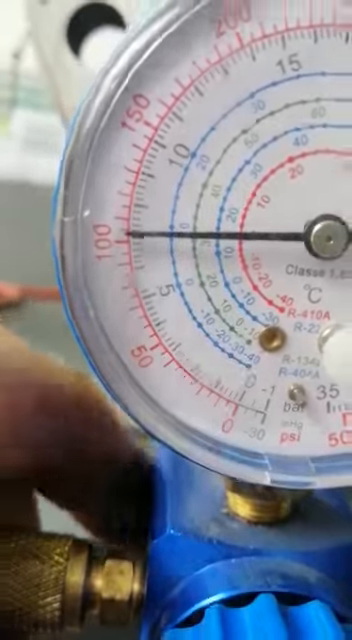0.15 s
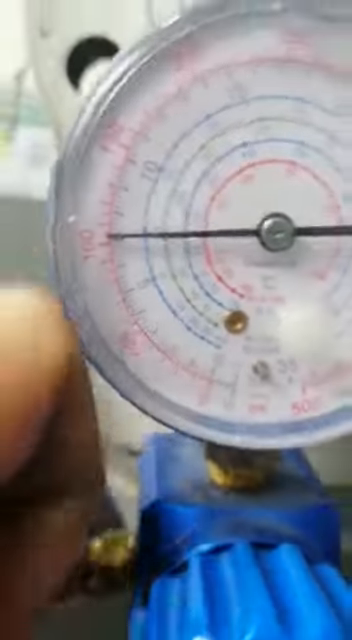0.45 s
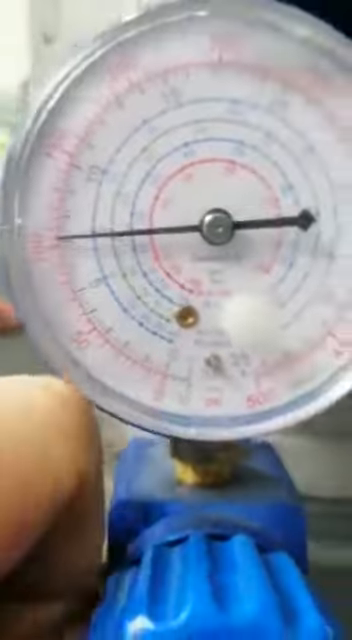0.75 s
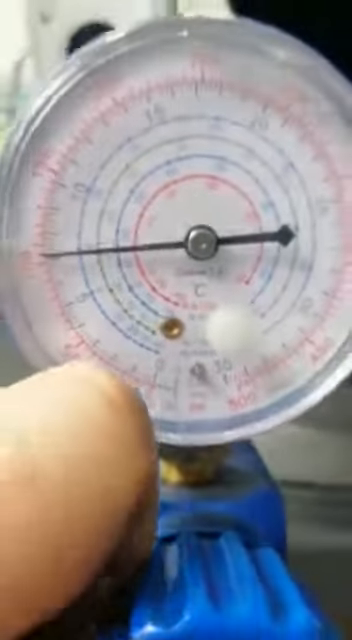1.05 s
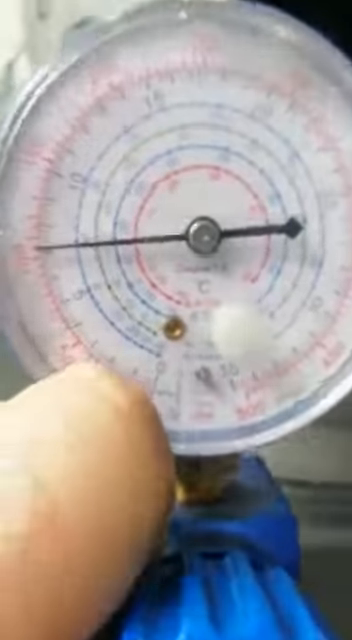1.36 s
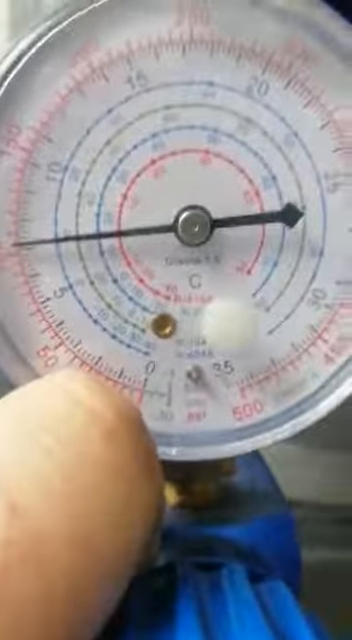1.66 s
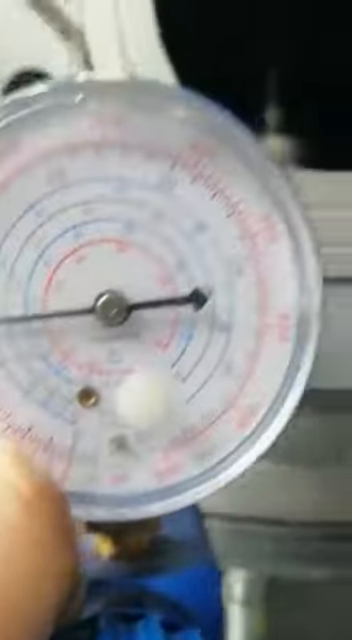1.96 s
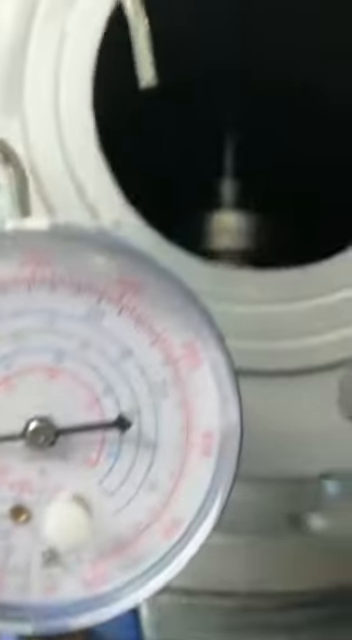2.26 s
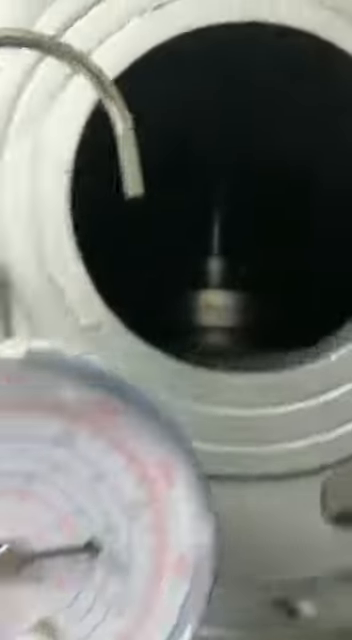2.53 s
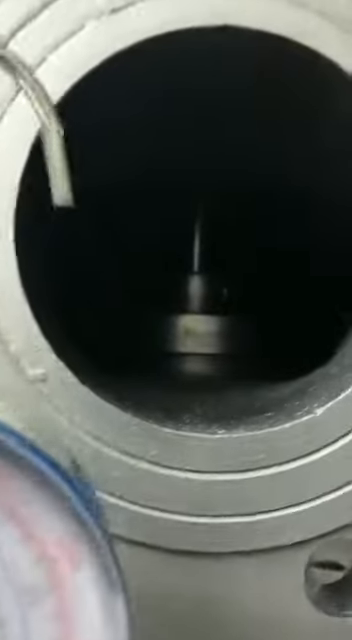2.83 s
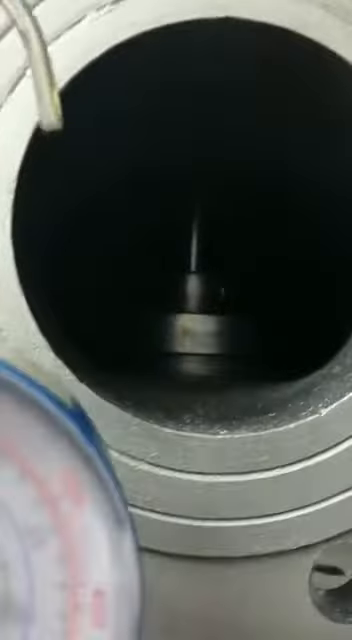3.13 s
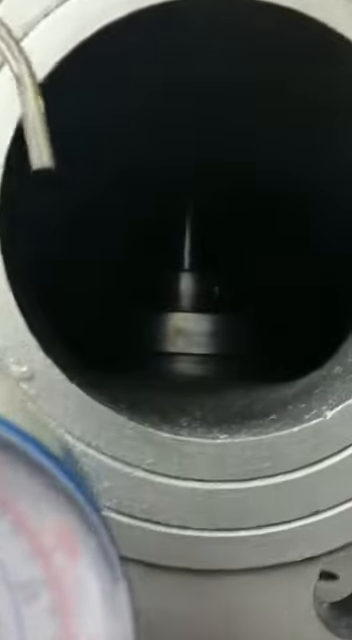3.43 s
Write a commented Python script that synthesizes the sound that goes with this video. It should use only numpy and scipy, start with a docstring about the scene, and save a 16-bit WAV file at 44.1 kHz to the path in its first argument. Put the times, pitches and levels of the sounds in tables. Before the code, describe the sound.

Steady hiss of pressurised air leaking past a valve, slowly growing duller in a workshop

```python
"""Engine cylinder leak test

Compressed air leaks past a valve in an engine cylinder under a pressure test, close to a phone in a workshop.
The hiss is banded noise that grows duller as the pressure sinks and the phone moves.
Narrow noise bands ring faintly in the metal passages. A low noise rush dies away at the start.
Later a distant motor, a sine and its octave, hums and slowly gains speed over a steady rumble."""
import sys
import numpy as np
from scipy import signal
from scipy.fft import rfft, irfft
from scipy.io import wavfile

SR = 44100
rng = np.random.default_rng(int(sys.argv[2]) if len(sys.argv) > 2 else 0)


def log_audio(samples):
    """Write samples as a 16-bit WAV file to the path given in sys.argv[1]."""
    # one column per channel
    frames = np.atleast_2d(samples).T
    # limit to full scale, then quantise
    limited = np.clip(frames, -1, 1)
    pcm = np.round(limited * 32767).astype(np.int16)
    wavfile.write(sys.argv[1], SR, pcm)


N = 158319
TOP_HZ = 15200  # upper edge of the hiss bands and of the phone's passband


def undb(db):
    """Decibels to amplitude gain."""
    return 10 ** (np.asarray(db) / 20)


def level(x, db):
    """Set the rms level over all samples and channels."""
    return x * undb(db) / np.sqrt(np.mean(x ** 2))


def seconds():
    """Time of each sample."""
    return np.arange(N) / SR


def bins():
    """Frequency of each spectral bin in Hz."""
    return np.fft.rfftfreq(N, 1 / SR)


def curve(table, axis=1):
    """One column of a time table at every sample."""
    rows = np.array(table)
    return np.interp(seconds(), rows[:, 0], rows[:, axis])


def at_pitch(table, hz):
    """Read a frequency table on a log axis."""
    rows = np.array(table)
    return np.interp(np.log(np.maximum(hz, 1)), np.log(rows[:, 0]), rows[:, 1])


def noise(gain):
    """Noise of unit rms with the given gain per bin."""
    spectrum = rfft(rng.standard_normal(N)) * gain
    return level(irfft(spectrum, N), 0)


def walk(rate_hz):
    """Unit-variance random points, rate_hz a second, joined by straight lines."""
    points = rng.standard_normal(1024)
    return np.interp(seconds() * rate_hz, np.arange(len(points)), points)


def pan(x, db):
    """Make the left louder than the right by db."""
    return x * undb(np.array([[db], [-db]]) / 2)


def room_noise(spectrum):
    """Unit-rms noise at two ports, alike in the bass and unrelated higher up."""
    low_shared_hz = 537  # coherence is one half here
    f = bins()
    shared = 1 / (1 + (f / low_shared_hz) ** 2)
    white = rfft(rng.standard_normal((2, N)))
    mid, side = white * undb(at_pitch(spectrum, f)) * np.sqrt([1 + shared, 1 - shared])
    return level(irfft(np.array([mid + side, mid - side]), N), 0)


def reflections():
    """Direct path plus a decaying random scatter of echoes from the engine and the walls."""
    echo_db, echo_delay_s, echo_t60_s = -9.5, .006, .25  # total echo energy against direct
    t = seconds()
    decay = np.exp(-np.log(1000) * t / echo_t60_s)
    tail = rng.standard_normal(N) * (t > echo_delay_s) * decay
    return 1 + undb(echo_db) * rfft(tail) / np.sqrt(np.sum(tail ** 2))


def workshop():
    """Steady rumble of the room, shaped noise shared by both ports in the bass."""
    # rumble spectrum: f/Hz, relative density/dB
    rumble_spectrum = [(20, -12), (35, -2.5), (60, 2), (95, -4.5), (125, 0.5), (200, -3), (350, -3),
                       (600, -6.5), (1200, -18.5), (3000, -35)]
    rumble_db, pan_db = -53, -4.5
    return pan(undb(rumble_db) * room_noise(rumble_spectrum), pan_db)


def rush():
    """Hollow low noise whose level falls linearly in dB."""
    # rush spectrum: f/Hz, relative density/dB
    rush_spectrum = [(60, -15), (130, -16), (170, 1), (230, -2.5), (330, 1), (470, -7.5), (650, -10),
                     (900, -5.5), (1500, -44), (3000, -46)]
    start_db, fall_db_per_s, pan_db = -38.5, 24.5, -4.5
    fade = undb(start_db - fall_db_per_s * seconds())
    return pan(room_noise(rush_spectrum) * fade, pan_db)


def motor():
    """Distant motor: a deep sine and weak octave that climb in pitch and swell unevenly."""
    # motor run-up: t/s, fundamental f/Hz, relative level/dB
    run_up = [(1.33, 55, -72), (1.52, 55.6, -53), (1.7, 56.8, -50), (1.86, 58.7, -60), (2.0, 59.8, -51),
              (2.3, 61.7, -51), (2.52, 63.3, -60), (2.57, 63.8, -48.5), (2.76, 65, -49), (2.85, 65.9, -57),
              (3.1, 67.1, -52), (3.27, 68.5, -46), (3.59, 69.2, -46)]
    trim_db, octave_db, waver_db, waver_rate_hz, pan_db = -0.5, -13, 1, 11, -5
    phase = 2 * np.pi * np.cumsum(curve(run_up, axis=1)) / SR
    tones = np.sin(phase) + undb(octave_db) * np.sin(2 * phase)
    hum = tones * undb(waver_db * walk(waver_rate_hz))
    return pan(level(hum, trim_db) * undb(curve(run_up, axis=2)), pan_db)


def rings(jet_db):
    """The flow excites narrow passage resonances: noise bands that follow the jet."""
    # passage resonances: f/Hz, rms level before pan and jet gain/dB
    resonances = [(1491, -61.5), (2466, -56), (2541, -57.5), (3187, -55.5), (3806, -58), (5179, -63),
                  (5410, -57), (5835, -59), (6735, -61), (7079, -65)]
    half_width_hz, pan_db = 10, -3.5  # half amplitude at half_width_hz off centre
    follow = 0.85  # dB per dB of jet
    f = bins()

    def port():
        total = 0
        for hz, db in resonances:
            total = total + undb(db) * noise(1 / (1 + ((f - hz) / half_width_hz) ** 2))
        return total

    return pan(np.array([port(), port()]), pan_db) * undb(follow * jet_db)


def hiss(spectrum, db, jet_db, count=20):
    """Turbulence at one port: each band follows the jet to its own degree and flickers; the middle swells."""
    # jet coupling of the hiss: f/Hz, slope/(dB per dB)
    jet_follow = [(300, 0), (1400, -.05), (2200, 0.4), (3300, 0.76), (5500, 1), (7500, 1.37), (9300, 0.42),
                  (11000, 0.49), (14000, 0.34)]
    low_hz = 454  # the hiss thins out below this
    flicker_db, flicker_rate_hz = 0.6, 17
    # one swell as the phone passes, from half swell_db below to half above
    swell_s, swell_width_s, swell_db = 1.82, 1, 2.5
    swell_hz, swell_octaves = 1980, 1.05
    f, t = bins(), seconds()
    colour = undb(at_pitch(spectrum, f)) * f / np.hypot(f, low_hz)
    air = rfft(level(noise(colour * reflections()), db))
    swell = swell_db * (np.exp(-((t - swell_s) / swell_width_s) ** 2) - .5)
    centres_hz = np.geomspace(600, TOP_HZ, count)
    out = 0
    # overlapping triangular bands that sum to the whole spectrum
    for hz, pick in zip(centres_hz, np.eye(count)):
        band = irfft(air * np.interp(f, centres_hz, pick), N)
        middle = np.exp(-(np.log2(hz / swell_hz) / swell_octaves) ** 2)
        flicker = flicker_db * walk(flicker_rate_hz)
        out = out + band * undb(at_pitch(jet_follow, hz) * jet_db + middle * swell + flicker)
    return out


def scene():
    """The leak, its hiss unrelated at the two ports, over the low sounds of the workshop."""
    # jet strength, as the level of its bright band: t/s, level/dB
    jet = [(0.0, -33), (0.82, -34.5), (0.86, -36), (1.19, -35.5), (2.18, -39), (3.56, -42), (3.59, -42)]
    # hiss spectrum at each port, before the low cut: f/Hz, relative density/dB
    left_spectrum = [(100, -88), (300, -92), (620, -82), (1000, -79.5), (1400, -76.5), (1750, -78.5),
                     (2300, -73), (2900, -70), (4200, -73), (5400, -72.5), (6400, -75), (7700, -75.5),
                     (8350, -82.5), (9300, -75), (10000, -75), (10900, -69.5), (11800, -74), (13000, -77),
                     (15000, -87)]
    right_spectrum = [(100, -81), (350, -75.5), (620, -81), (1000, -74), (1400, -70), (1700, -71),
                      (2300, -67), (2900, -68.5), (3550, -67), (4200, -71), (5500, -69), (6400, -70.8),
                      (7700, -70.5), (8350, -73.5), (9300, -67.5), (10000, -74.5), (10900, -75),
                      (11800, -80.5), (13000, -81.5), (15000, -81.5)]
    left_db, right_db = -32.5, -30  # rms before jet, swell and flicker gains
    jet_ref_db = -38.5  # jet strength that gives zero jet gain
    flutter_db, flutter_rate_hz = 0.31, 12
    jet_db = curve(jet) - jet_ref_db + flutter_db * walk(flutter_rate_hz)
    left = hiss(left_spectrum, left_db, jet_db)
    right = hiss(right_spectrum, right_db, jet_db)
    return workshop() + rush() + motor() + rings(jet_db) + np.array([left, right])


def record(dry):
    """The phone cuts the top steeply: elliptic low-pass, 0.1 dB ripple, 80 dB stopband."""
    low_pass = signal.ellip(12, .1, 80, TOP_HZ, fs=SR, output="sos")
    return signal.sosfilt(low_pass, dry)


dry = scene()
out = record(dry)
log_audio(out)
```